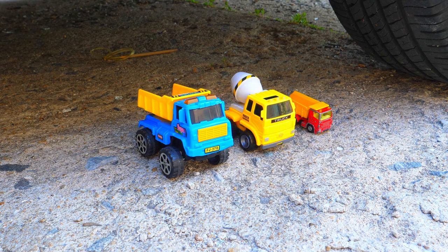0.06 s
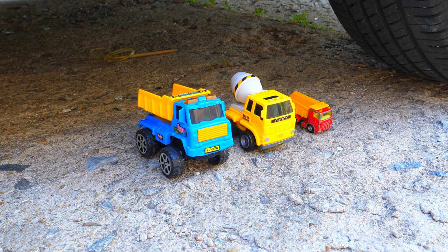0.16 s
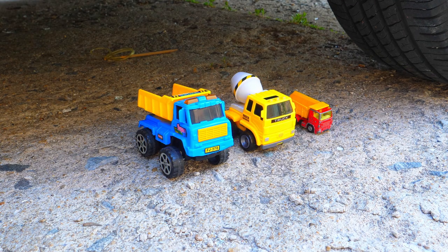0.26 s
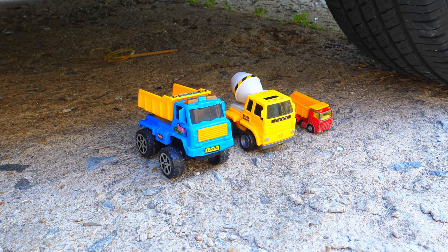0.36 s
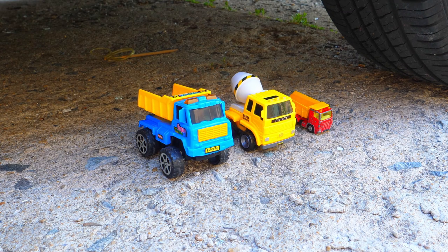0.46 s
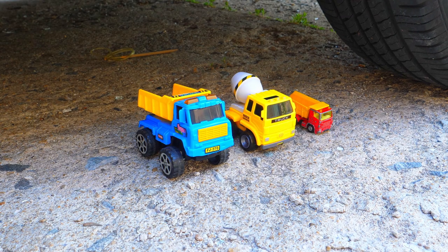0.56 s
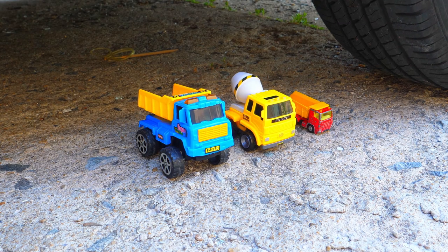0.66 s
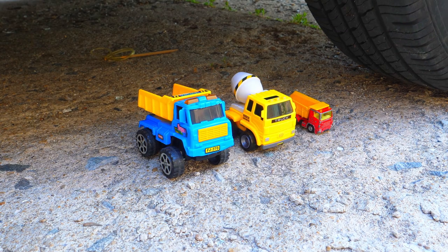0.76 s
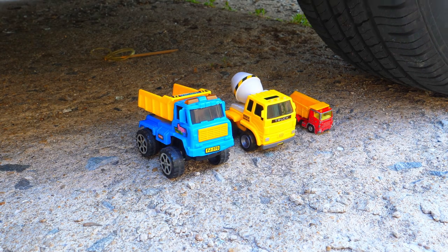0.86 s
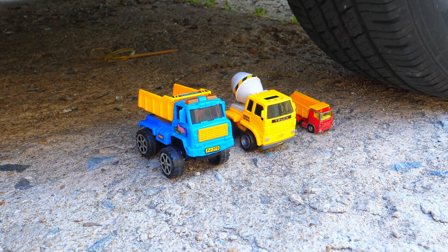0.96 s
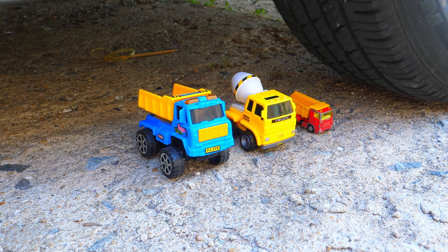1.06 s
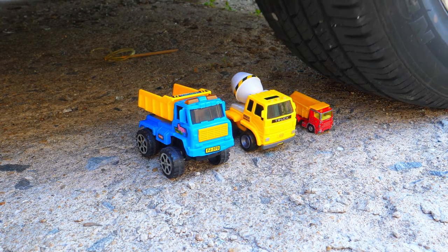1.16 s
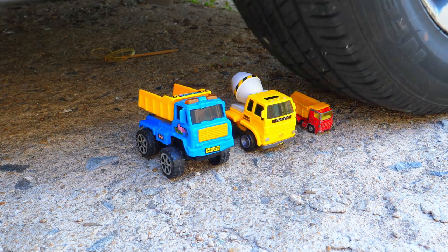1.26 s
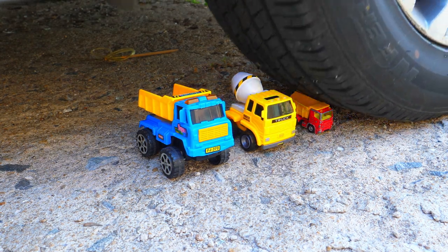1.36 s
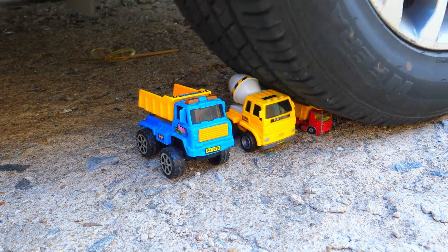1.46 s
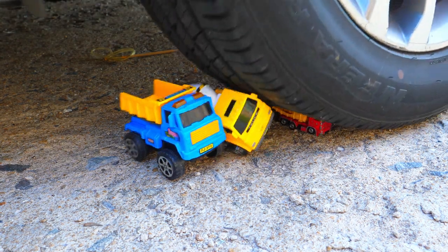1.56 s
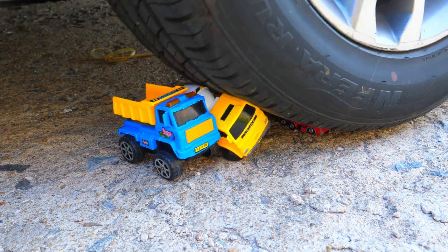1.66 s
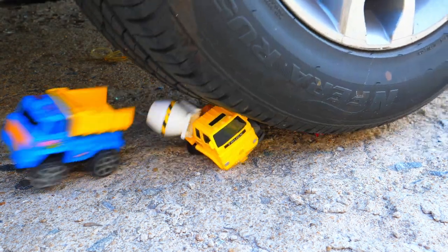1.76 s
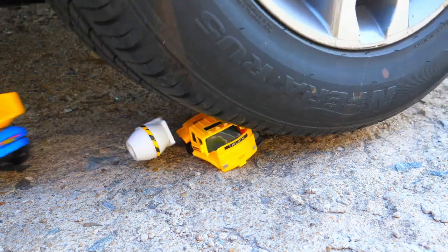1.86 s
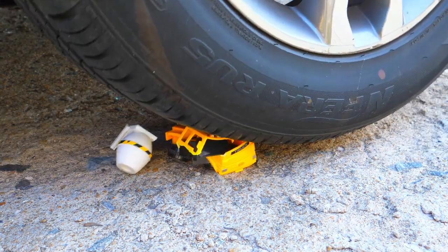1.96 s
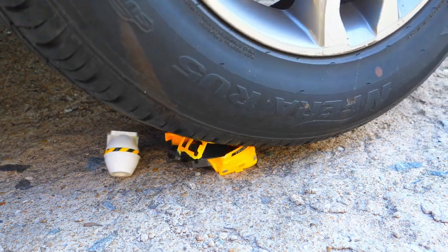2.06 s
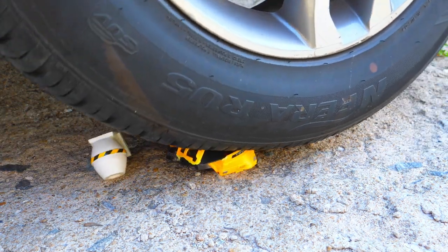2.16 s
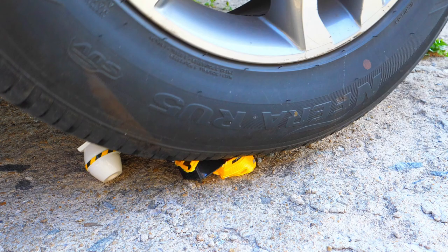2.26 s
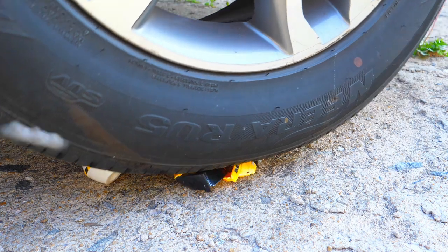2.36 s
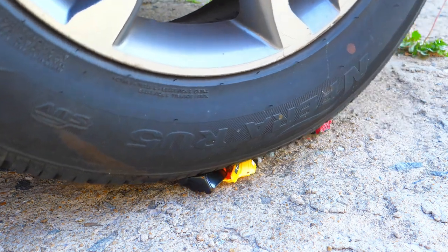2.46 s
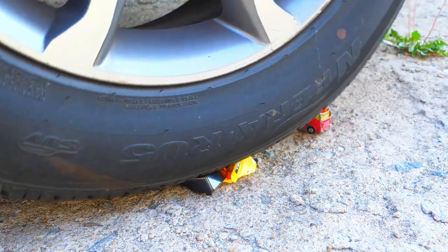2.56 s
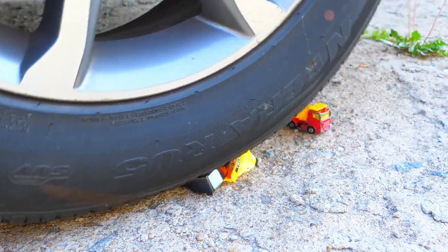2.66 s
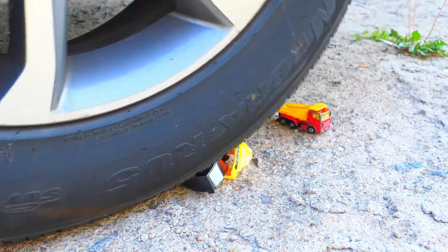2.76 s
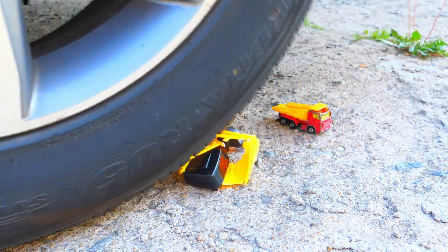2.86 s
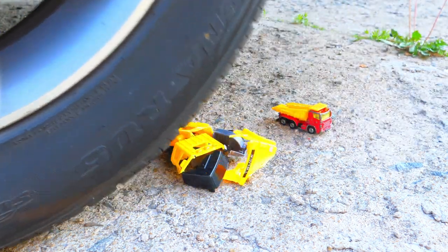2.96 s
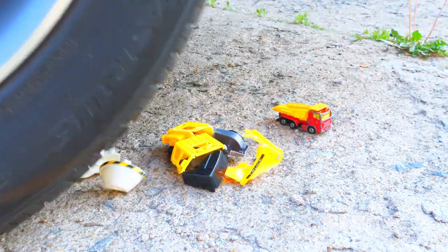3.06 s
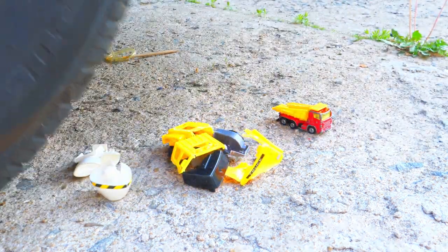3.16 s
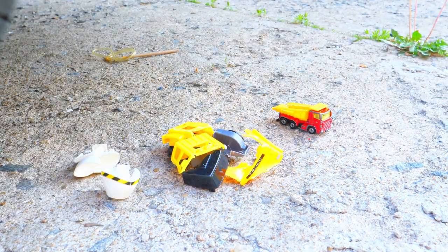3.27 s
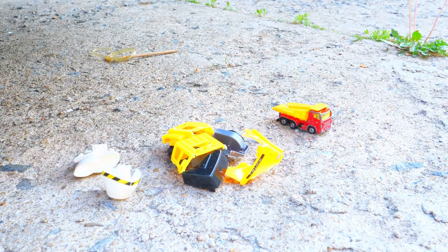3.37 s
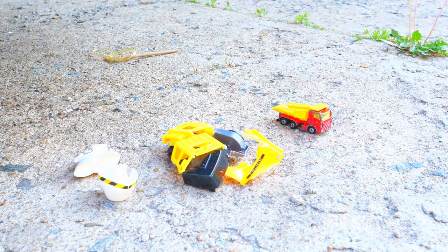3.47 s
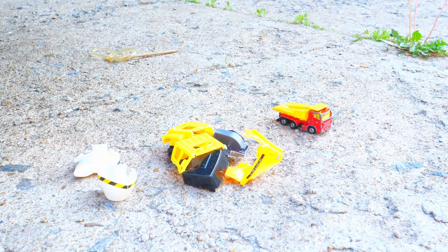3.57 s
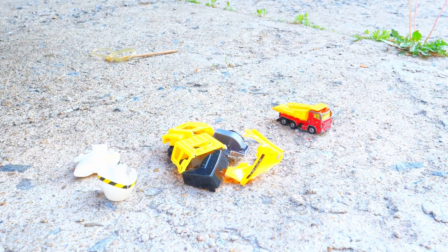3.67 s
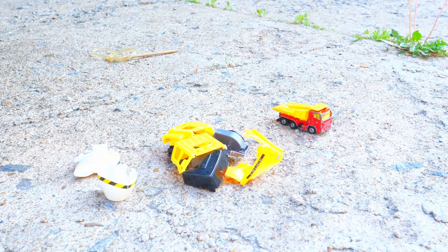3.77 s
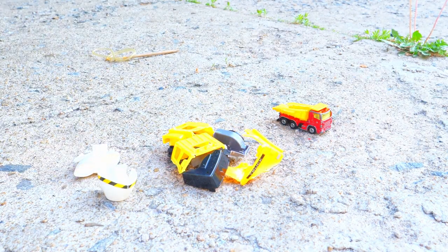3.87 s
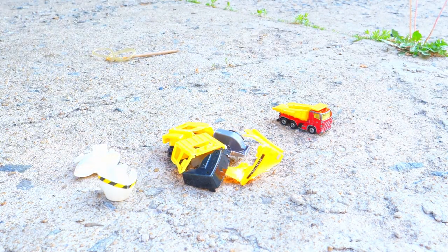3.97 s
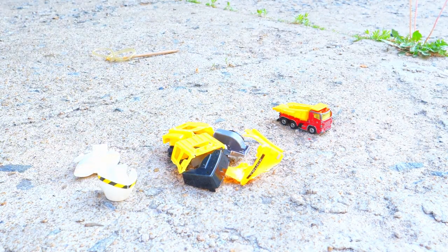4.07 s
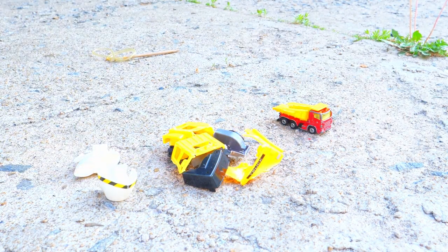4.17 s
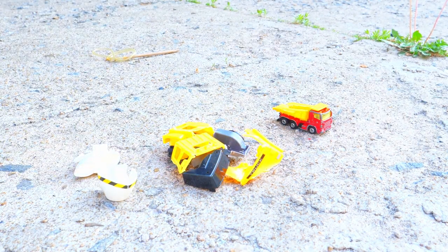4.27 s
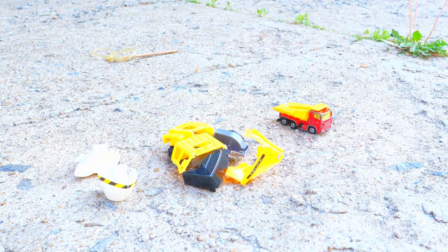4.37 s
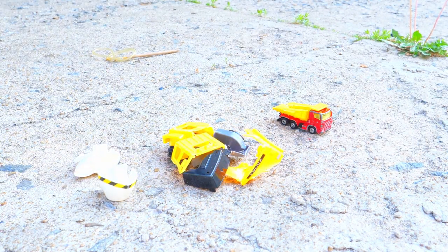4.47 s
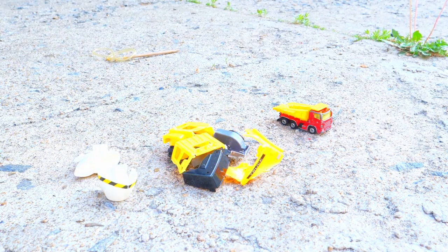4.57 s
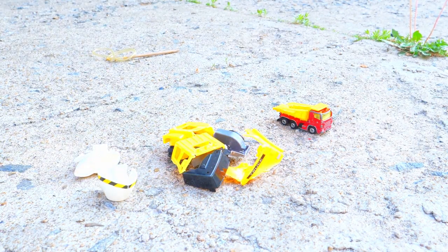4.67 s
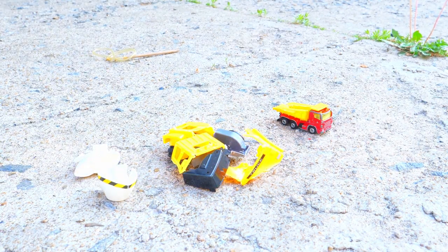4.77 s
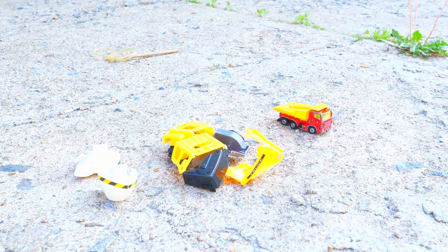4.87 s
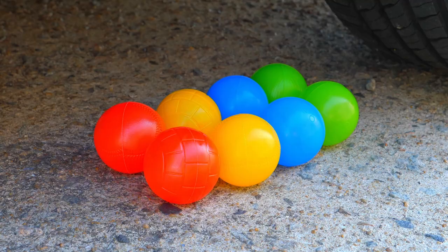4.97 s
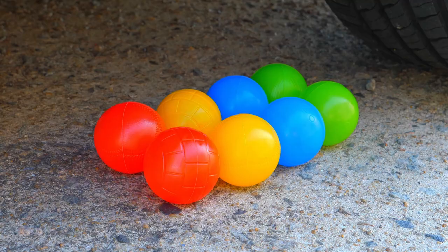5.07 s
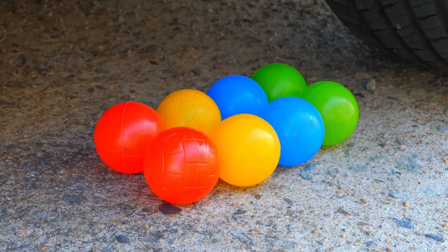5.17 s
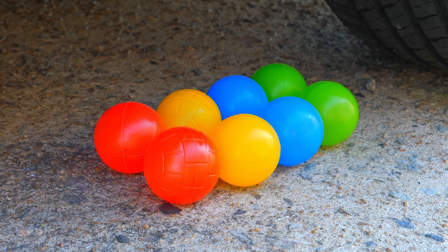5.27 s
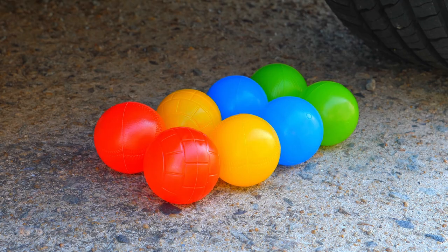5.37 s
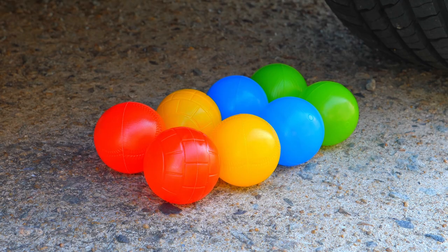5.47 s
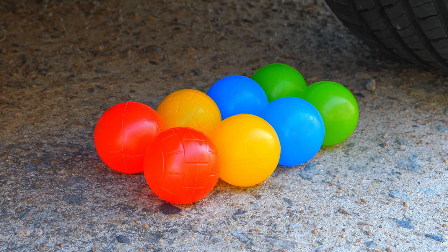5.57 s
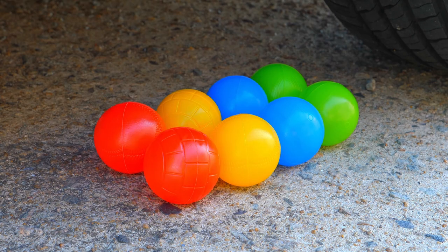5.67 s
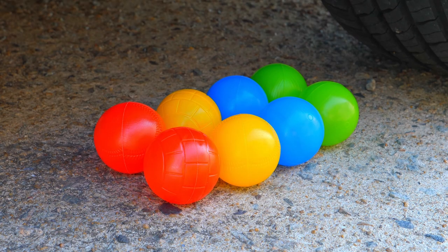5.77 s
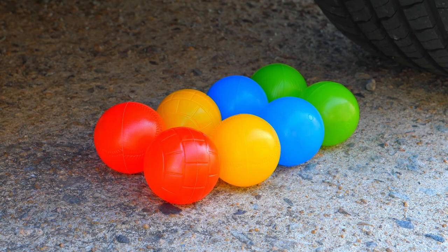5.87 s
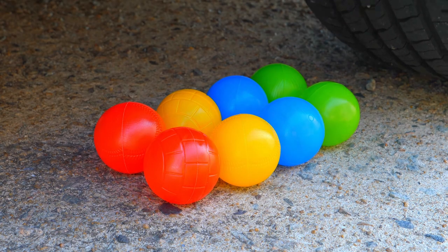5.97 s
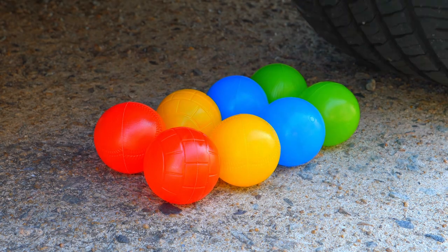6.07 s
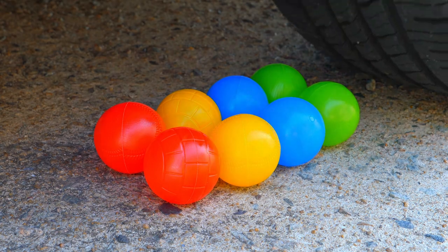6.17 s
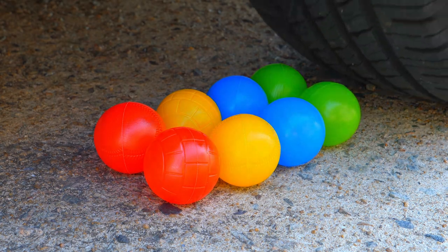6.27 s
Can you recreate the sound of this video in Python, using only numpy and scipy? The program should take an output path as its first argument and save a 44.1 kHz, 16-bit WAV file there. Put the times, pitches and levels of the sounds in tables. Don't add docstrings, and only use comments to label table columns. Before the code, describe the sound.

Steady engine drone on rough concrete, sudden violent bursts of brittle plastic cracking and grinding, settling fragments, a brief gap, then engine idling again.

```python
import sys
import numpy as np
from scipy import signal
from scipy.fft import rfft, irfft
from scipy.io import wavfile
from scipy.ndimage import uniform_filter1d

SR = 44100
rng = np.random.default_rng(int(sys.argv[2]) if len(sys.argv) > 2 else 0)


def gain_from_db(level_db):
    decades = np.asarray(level_db, float) / 20
    return 10 ** decades


def store_wav(level_fs):
    pcm = np.round(np.clip(np.atleast_2d(level_fs), -1, 1) * 32767)
    wavfile.write(sys.argv[1], SR, pcm.T.astype(np.int16))


N = 279153

# start in seconds, peak in dB, ring in Hz, splinter in dB, burst in ms.
CAB_BREAKS = [(1.4151, -12.5, 5940, 5.5, 8.2), (1.4475, -16, 12500, 10.5, 3), (1.4723, -6.5, 11900, 0, 1.7),
              (1.4771, -2.5, 1940, 3.5, 2.1), (1.5074, -7, 2260, 5, 0.98), (1.5459, -6, 4870, -8, 1.7),
              (1.5559, -9, 1920, -6, 2.3), (1.5753, -19, 1760, 0, 1.1), (1.5975, -19, 1137, -12, 1.9),
              (1.603, -12.5, 1140, 6.5, 3.1), (1.6319, -0.5, 1050, -5, 0.43), (1.6539, -12, 1050, -1, 3.5),
              (1.7097, -18, 1120, 10, 3.4), (1.721, -2.5, 1065, 0.5, 7.1), (1.7452, -9, 2280, -7, 9.3),
              (1.8078, -4, 1990, 0, 3.3), (1.8652, -17, 1970, 6, 2), (1.8721, -2.5, 4980, 4, 1.6),
              (1.8805, -9.5, 1990, -3, 4.3), (1.8901, -40, 8530, -5, 2.5), (1.9046, -13, 1190, -20, 0.69),
              (1.9223, -7.5, 2330, 4, 11), (1.9379, -8.5, 4120, 2, 1.8), (2.0526, -13, 4020, 4.5, 2.5)]
# start in seconds, peak in dB, ring in Hz, splinter in dB, hollow body in dB.
CHASSIS_BREAKS = [(2.111, -20.5, 1610, 0, -39), (2.1769, -7.5, 2150, 10.5, -11.5),
                  (2.2122, -10, 8600, 8, -2), (2.2181, -10, 1440, -29, 4), (2.2315, -5.5, 4220, -9, -8),
                  (2.2427, -5.5, 1860, -1, -2), (2.3166, -19, 3240, 8, -2.5), (2.3251, -11.5, 8400, 4, -11),
                  (2.3372, -6, 1090, 5.5, -14), (2.348, -7, 1390, 1, -6), (2.355, -14, 3820, 9, -8),
                  (2.3666, -12, 4900, 3, -11), (2.375, -12.5, 3750, -6, -4), (2.407, -11, 1380, 3.5, -8),
                  (2.437, -17.5, 4220, 13, -6), (2.4584, -23, 3900, -12, -9), (2.4851, -3, 8550, 6, -8),
                  (2.5043, -16.5, 3820, -26, -3), (2.5475, -4, 1750, 3, -8), (2.5906, -23, 4150, 3, -19),
                  (2.6106, -23, 1830, -22, -4), (2.6339, -9.5, 1050, 3.5, 1), (2.6706, -7.5, 925, 4.5, 4),
                  (2.7362, -26.5, 6050, 8, -21)]
# start in seconds, peak in dB, ring in Hz, splinter in dB, burst
# in ms.
DRUM_BREAKS = [(2.7755, -20, 7900, -1, 4.1), (2.8368, -22, 2260, -2, 2.9), (2.8508, -17, 5140, 7, 2.1),
               (2.8574, -14, 2360, -13, 8.9), (2.8709, -18.5, 6400, -2, 3), (2.9338, -19, 5140, -2, 4.9),
               (3.0084, -18, 5700, -22, 2.8), (3.0868, -13, 2170, 1, 1.8), (3.1655, -6, 3360, -3, 2.1),
               (3.1665, -12.5, 2110, -12, 23), (3.21, -12.5, 5700, -4, 21), (3.2328, -10.5, 2040, -1, 4),
               (3.2475, -10.5, 3750, 4, 5.6), (3.253, -5.5, 1310, 1.5, 5.5), (3.265, -12, 7050, 11, 3.5),
                (3.282, -10, 3600, -9, 1.6), (3.288, -4.5, 7130, 8, 1.8), (3.3148, -5, 3770, -2, 3.5),
                (3.3386, -10, 5980, 1, 4.6), (3.352, -10, 3750, -4, 1.6), (3.3574, -5, 3870, -1, 1.6),
                (3.367, -17, 3300, 6, 6), (3.3794, -5.5, 4220, -3, 2.9), (3.3873, -11.5, 3930, 1, 1.1),
                (3.411, -8.5, 3250, -4, 1.7), (3.4523, -3.5, 3430, 0.5, 5.5), (3.4635, -5.5, 3760, 2, 1.8),
                (3.543, -6.5, 3870, -7.5, 0.98), (3.639, -25, 1510, -5, 12), (3.656, -16.5, 5930, 1, 0.94),
                (3.6702, -4.5, 2300, 3, 2), (3.6923, -34, 2720, -21, 5.4), (3.698, -24, 7100, -15, 4.2),
                (3.342, -19.5, 3850, -8, 2.2), (3.213, -12.5, 2370, 8, 1.8), (3.259, -19, 2230, -4, 4.6),
                (3.175, -17, 2150, 2, 4)]
# start in seconds, peak in dB, pitch in Hz, lower ring in dB.
HOLLOW_KNOCKS = [(1.4776, -17.5, 800, 2.5), (1.5076, -9, 903, -24), (1.632, -5.5, 684, -21),
                 (1.7212, -6.5, 1005, -25), (1.8078, -9, 740, -36), (1.8728, -12, 710, -30),
                 (1.9223, -11, 824, -33), (2.2132, -13.5, 736, -18), (2.2188, -21, 520, -21),
                 (2.2315, -8, 710, -22), (2.2426, -3.5, 680, -32), (2.3482, -9.5, 685, -28),
                 (2.3743, -18, 660, -27), (2.4855, -3, 628, -18), (2.5475, -6, 565, -13),
                 (2.601, -29, 680, -12), (2.6346, -7, 723, -32), (2.6712, -22, 790, -20)]
# start in seconds, peak in dB, ring in Hz, splinter in dB,
# burst in ms.
MINOR_CRACKS = [(1.431, -20, 2760, 0, 1.5), (1.465, -24, 3950, 14, 1.5), (1.525, -30, 2980, -4, 1.5),
                (1.541, -24, 6030, 3, 1), (1.569, -22, 2120, 3, 5.9), (1.688, -38, 1330, 8, 2),
                (1.702, -41, 5500, 3, 1.1), (1.782, -32, 5700, -3, 1.3), (1.854, -27, 1940, 8, 2.7),
                (1.897, -15, 1190, -10, 0.66), (1.9152, -15, 1190, -8, 0.7), (1.978, -29, 2330, 0, 6.9),
                (1.991, -32, 2300, 0, 3), (2.025, -42, 1440, 11, 5.8), (2.139, -33, 1440, 8, 3.1),
                (2.198, -22, 6100, -9, 1.6), (2.533, -35, 3500, 10, 1.5), (2.615, -28, 5500, 5, 1.5),
                (2.65, -32, 6460, -3, 2), (2.689, -22, 1420, -8, 2), (2.712, -25.5, 6060, 2, 3),
                (2.794, -20, 4270, -4, 12), (2.826, -24, 1470, -10, 2.5), (2.928, -30, 3500, -2, 3.8),
         (2.963, -27, 4100, 1, 7.4), (2.971, -20, 1400, -15, 0.77), (2.987, -36, 5400, -3, 2),
         (3.005, -24, 2400, -8, 2.4), (3.056, -43, 2320, -8, 8), (3.092, -23, 3900, 3, 3),
         (3.157, -24, 2300, -4, 2), (3.226, -19, 3520, 20.5, 1.5), (3.393, -25, 1290, 6, 3.5),
         (3.527, -35, 7300, 6, 3), (3.586, -28.5, 5800, 1, 2), (3.592, -29, 5600, 5, 7.2),
         (3.619, -32, 4800, -3, 1.5), (3.661, -26, 3860, -12, 4.5), (3.683, -28, 3640, -10, 6.9),
         (3.69, -28, 2780, -10, 8.7), (3.701, -28, 3350, -17, 3.1), (3.712, -28, 3540, -1, 1.7),
         (3.747, -33.5, 3530, -8, 6.1), (3.606, -35, 3200, -1, 7.3), (3.721, -34, 3300, -6, 6),
         (3.789, -35, 3560, 4, 7.8), (3.946, -30, 2970, -9, 3.8), (3.997, -35, 2630, -17, 3),
         (4.058, -41, 2500, -13, 5.3), (4.132, -45, 3500, -10, 1.5), (4.211, -35, 3380, 6, 1.5),
         (4.277, -42, 2680, -10, 4.3), (4.071, -35, 2600, -15, 5.3), (3.871, -41, 8800, -6, 5.5),
         (3.805, -31, 7300, -11, 3.3), (4.231, -34, 2470, -2, 4)]
# frequency in Hz, level in dB per Hz.
SPLINTER = [(3240, -18), (5500, -1), (6880, -0.5), (8710, 4.5), (10500, -5.5), (14100, 0.5), (15000, -3),
            (16000, -12)]
# frequency in Hz, width in Hz, level in dB.
PANELS = [(1440, 1040, 23.5), (2280, 580, -3), (2410, 150, -5), (3760, 1300, 14), (5700, 280, -15),
          (7750, 320, 7)]
# frequency in Hz, time to fade by 60 dB in ms, level in dB.
TRUCK_RINGS = [(1050, 49, -1), (1476, 30, 1.5), (2300, 50, -2.5), (5750, 40, -7)]
DRUM_RINGS = [(1450, 48, -7), (2150, 115, -4.5), (2400, 27, 2), (2780, 49, 2), (3670, 44, -3.5),
              (7300, 45, -6)]
# time in seconds, level in dB.
TREAD_PRESSURE = [(1.36, -73), (1.4, -46), (1.6, -43), (1.8, -36), (1.9, -26.5), (2.02, -37.5), (2.15, -33),
                  (2.28, -41), (2.4, -33),
                  (2.6, -38), (2.9, -27.5), (3.14, -36.5), (3.2, -26), (3.35, -22), (3.44, -30.5), (3.72, -42.5),
           (4.1, -53.5), (4.6, -54)]
# frequency in Hz, level in dB per Hz.
GRIT = [(300, -41), (600, -0.5), (1200, -0.5), (2400, 1), (3200, -1), (4000, -4), (6000, 1.5), (7500, -6)]
# start in seconds, length in ms, level in dB, brightness in dB.
SCRAPES = [(1.406, 27, -25.5, -1), (1.557, 24, -24, -4), (2.039, 13.7, -40.5, 11), (2.174, 8.1, -21.5, -12),
           (2.676, 41, -36, 4.5), (2.841, 49, -37.5, 5), (3.085, 35, -31.5, -9), (3.167, 13, -21.5, 0),
           (3.447, 25, -33, 3), (4.385, 32, -55, 7), (6.23, 20, -32.5, 3)]
# start in seconds, peak in dB, ring in Hz.
SHARDS = [(3.737, -28, 2880), (3.8027, -23.5, 2790), (3.8302, -26.5, 3760), (3.8875, -26.5, 4920),
          (3.914, -22.5, 2730), (3.9318, -31, 2780), (3.9575, -27, 2880), (3.968, -35, 4950),
          (3.985, -27, 2400), (4.031, -37, 2600), (4.079, -29.5, 2630), (4.196, -26.5, 2740),
          (4.227, -26.5, 2330), (4.2437, -27, 3260), (4.2973, -34.5, 2450)]
# start in seconds, peak in dB.
RELAX_TICKS = [(4.3904, -28), (4.417, -29), (4.44, -24), (4.454, -30), (4.4685, -25.5), (4.4854, -31),
               (4.492, -30), (4.5014, -32), (4.515, -35)]
# frequency in Hz, width in Hz, level in dB.
SHARD_RINGS = [(2600, 630, -3.5), (3660, 790, -6.5), (7300, 500, -25)]
# time in seconds, level in dB.
FIRST_ENGINE = [(0, -30.5), (.7, -30.5), (1.38, -30), (1.6, -28), (1.85, -44.5), (2.9, -39.5), (3.6, -46),
                (4.1, -49), (4.99, -48.5)]
# time in seconds, level in dB.
SECOND_ENGINE = [(5.0, -32), (6.33, -30.5)]
# multiple of the firing rate, level in dB.
EXHAUST = [
    [(1, -36), (2, -16), (3, -21), (4, -20), (5, -6), (6, -32), (7, 0), (8, -7.5), (9, -6), (10, -8.5), (11, -14), (12, -32), (13, -2.5), (14, -14), (15, -9.5)],
    [(1, -21), (2, -5), (3, -6), (4, -7), (5, -4), (6, -14), (7, -5), (8, -6), (9, -1.5), (10, -7), (11, -12), (12, -8), (13, 2.5), (14, -26), (15, -26)],
]
# frequency in Hz, width in Hz, level in dB.
BAY = [
    [(565, 70, -5.5), (875, 47, 0), (1228, 55, -3), (1916, 46, -2), (2330, 28, -3), (3250, 32, -12), (3750, 64, 5), (4220, 68, -18), (4600, 71, -21), (5370, 59, -20), (7180, 120, -17)],
    [(578, 80, -3), (869, 24, 7.5), (1310, 67, 2), (2035, 130, -3.5), (2680, 60, -6), (3330, 140, -10), (3930, 400, -11), (4610, 110, -1), (5700, 150, -6), (7400, 160, 1)],
    [(747, 46, 10), (857, 41, 12), (442, 40, -7), (273, 330, 1), (2110, 1100, -11)],
]
# frequency in Hz, level in dB per Hz.
CLATTER = [(24, -44), (40, -21), (150, -16), (310, -11), (500, -4.5), (990, -5), (2900, -9), (3800, -11.5),
           (6000, -14), (8500, -21), (10500, -27.5), (13000, -28), (15500, -35.5), (17000, -58)]
# start in seconds, level in dB.
SURGES = [(1.735, 23), (2.08, 8), (2.77, 5.5), (3.5, 17)]
# start in seconds, length in ms, level in dB.
BUMPS = [(1.46, 40, -43), (3.26, 170, -48)]

CUT_START_S, CUT_END_S = 4.992, 5.018
CAB_HZ, CHASSIS_HZ, DRUM_HZ = 744, 670, 940
CHASSIS_MS = 1.8
CAB_BODY_DB, DRUM_BODY_DB = 0, -8.5
BODY_PER_DB = 1.87
KNOCK_MS, LOWER_HZ, LOWER_MS = 1.7, 344, 7.1
CRUMPLE_DB = -10
THIN_FROM_HZ, THIN_SHARE = 2500, 0.48
DRUM_FROM_S, RING_DB = 2.76, -46.5
SETTLE_MS, RELAX_MS, RELAX_HZ = 4.2, 1.2, 2450
IDLE_HZ, PULL_HZ = (185.6, 186), 197
PULL_START_S, PULL_END_S, PULL_RAMP_S = 1.4, 4.08, 0.046
EXHAUST_DB = -10.5, -22.5
LUG_DB, BOOM_WOBBLE_DB = -13, 4
SURGE_RISE_S, SURGE_FALL_S = 0.033, 0.36
REAR_LIFT_DB, REAR_FROM_S = 9.5, 3.65
DUCK_KNEE_DB, DUCK_SHARE, DUCK_RELEASE_S = -29.5, 0.96, 0.28
TOP_HZ = 16200


def level(x, db=0):
    return x * gain_from_db(db) / np.sqrt(np.mean(x ** 2))


def curve(table):
    seconds, db = np.transpose(table)
    return np.interp(np.arange(N) / SR, seconds, db)


def colour(x, points, peaks=(), lift_db=0):
    hz = np.arange(N // 2 + 1) * SR / N + 1
    point_hz, point_db = np.transpose(points)
    gain = gain_from_db(np.interp(np.log(hz), np.log(point_hz), point_db, -90, -90))
    bumps = sum(gain_from_db(lift_db + db / 2) / (1 + (2 * (hz - f) / w) ** 2) for f, w, db in peaks)
    return irfft(rfft(x) * gain * (1 + bumps), N)


def band(x, lo_hz, hi_hz):
    sos = signal.butter(2, [lo_hz, min(hi_hz, .45 * SR)], "band", fs=SR, output="sos")
    return signal.sosfilt(sos, x)


def walk(rate):
    k = int(SR / rate)
    steps = np.repeat(rng.standard_normal(N // k + 1), k)
    return 1.09 * uniform_filter1d(uniform_filter1d(steps, k), k)[:N]


def breaks():
    def crumple(s):
        return CRUMPLE_DB * any(abs(s - k[0]) < .002 for k in HOLLOW_KNOCKS)

    def knocked(rows, body_db, body_hz):
        return [(s, db, hz, body_db + BODY_PER_DB * db + crumple(s), splinter, ms, body_hz)
                for s, db, hz, splinter, ms in rows]

    chassis = [(s, db, hz, body + crumple(s), splinter, CHASSIS_MS, CHASSIS_HZ)
               for s, db, hz, splinter, body in CHASSIS_BREAKS]
    cab = knocked(CAB_BREAKS, CAB_BODY_DB, CAB_HZ)
    drum = knocked(DRUM_BREAKS, DRUM_BODY_DB, DRUM_HZ)
    truck = snaps(cab + chassis, 0.91, 0.28, -17.0, thin_share=0.2)
    return truck + knocks() + snaps(drum, 0.72, 0.45, -16.0)


def snaps(table, ring_share, ring_ms, tail_db, thin_share=THIN_SHARE):
    out, t = np.zeros(N + 4096), np.arange(4096) / SR
    ragged = rng.standard_normal(N) * gain_from_db(1.7 * walk(900))
    mid = level(band(ragged, 1170, 7560))
    low = level(band(ragged, 253, 640))
    mid = level(colour(mid, ((300, 0.041), (9000, 0)), PANELS, lift_db=2.0))
    thin = level(band(mid, THIN_FROM_HZ, 10200))
    high = level(colour(ragged, SPLINTER))
    chance = rng.random((len(table), 9))
    for (s, db, hz, body_db, splinter_db, ms, body_hz), c in zip(table, chance):
        tau = max(ms, .5) * 0.6 / 1000
        j = int(c[0] * (N - 4096))
        piece = slice(j, j + 4096)
        rise = 1 - np.exp(-(t / (0.31 * tau)) ** 2)
        burst = rise * np.exp(-t / tau)
        tail = rise * gain_from_db(tail_db) * np.exp(-t / 0.013)

        pitch = hz * np.array([[1], [0.45 + 0.375 * c[1]], [1.6 + 0.525 * c[2]]])
        tones = np.sin(2 * np.pi * (pitch * t + c[3:6, None]))
        rings = (tones * [[1], [.35], [.35]]).sum(axis=0)
        rings *= rise * np.exp(-t / (tau * 1.5 + ring_ms / 1000)) * min(1, 0.0031 / tau)
        rings *= .8 + .6 * low[piece][::-1]

        shell = 2 * np.pi * body_hz * (0.798 + 0.42 * c[6]) * t
        body = 1.1 * np.sin(shell) * np.exp(-t / 0.0023)
        body += 0.05 * (CHASSIS_HZ / body_hz) ** 3 * np.sin(.5 * shell) * np.exp(-t / 0.011)
        body += 0.33 * low[piece] * rise * np.exp(-t / 0.0079)

        share = thin_share * (hz > THIN_FROM_HZ)
        noise = 0.59 * (burst + tail) * ((1 - share) * mid[piece] + share * thin[piece])
        noise += 0.5 * gain_from_db(splinter_db) * (burst + 0.86 * tail) * high[piece]
        i = int(s * SR)
        out[i:i + 4096] += gain_from_db(db + 1.5) * (ring_share * rings + noise + 1.25 * gain_from_db(body_db) * body)
    return out[:N]


def knocks():
    out, t = np.zeros(N), np.arange(4096) / SR
    for s, db, hz, low_db in HOLLOW_KNOCKS:
        fade = np.exp(-t * 1000 / KNOCK_MS) + 0.054 * np.exp(-t / 0.013)
        knock = np.sin(2 * np.pi * hz * t) * fade
        lower = np.sin(2 * np.pi * LOWER_HZ * t) * np.exp(-t * 1000 / LOWER_MS)
        out[int(s * SR):][:4096] -= gain_from_db(db + 3.5) * (knock + gain_from_db(low_db + 0.5) * lower)
    return out


def small_cracks():
    rows = [(s, db - 1.5, hz, -22.0, splinter, ms, DRUM_HZ) for s, db, hz, splinter, ms in MINOR_CRACKS]
    return snaps(rows, 1.8, 0.57, -16.0)


def afterring(toys):
    drum = np.arange(N) > DRUM_FROM_S * SR
    out = np.zeros(N)
    for rings, part in ((TRUCK_RINGS, ~drum), (DRUM_RINGS, drum)):
        for hz, ms, db in rings:
            p = np.exp(-np.log(1000) / (ms / 1000 * SR))
            shake = np.abs(toys) * part * rng.standard_normal(N) * gain_from_db(3 * walk(15))
            ring = signal.lfilter([1, 0, -1], [1, -2 * p * np.cos(2 * np.pi * hz / SR), p * p], shake)
            out += ring * gain_from_db(db + 4 * walk(200))
    return out * gain_from_db(RING_DB)


def crackle(rate, spread_db):
    size = gain_from_db(np.minimum(spread_db * rng.exponential(size=N), 9))
    grains = (rng.random(N) < rate / SR) * size
    puffs = signal.lfilter([1], [1, -np.exp(-1 / (0.0069 * SR))], grains)
    return rng.standard_normal(N) * (puffs + 0.87)


def grind(gain):
    t = np.arange(N) / SR
    dull = level(colour(crackle(450, 1.2), GRIT, PANELS, lift_db=-9.5))
    bright = level(colour(crackle(250, 4.0), SPLINTER), -3.7)
    bed = dull * gain_from_db(0.45 * walk(28.9)) + .5 * bright * gain_from_db(1.1 * walk(29.0))
    out = bed * gain_from_db(curve(TREAD_PRESSURE)) * gain
    out[:int(1.37 * SR)] = 0
    out[int(CUT_START_S * SR):] = 0
    for s, ms, db, bright_db in SCRAPES:
        shape = np.interp((t - s) * 1000 / ms, (0, .15, .7, 1.2), (0, 1, .7, 0))
        out += shape * gain_from_db(db + 5.5) * (dull + gain_from_db(bright_db) * bright)
    return out


def shards():
    out, t = np.zeros(N), np.arange(4096) / SR
    rows = [(s, db, hz, SETTLE_MS * hz / RELAX_HZ, .8) for s, db, hz in SHARDS]
    rows += [(s, db - 3.5, RELAX_HZ, RELAX_MS, .15) for s, db in RELAX_TICKS]
    for (s, db, hz, ms, loose), noise in zip(rows, rng.standard_normal((len(rows), 4096))):
        tau = max(ms - 1.0, .2) / 1000
        width = 1 + min(0.69 / ms ** 1.23, .45)
        tick = noise * (1 - np.exp(-t / (0.081 * tau))) * np.exp(-t / tau)
        rustle = tick + 0.18 * noise * np.exp(-t / 0.043)
        tone = np.sin(2 * np.pi * hz * t)
        sound = band(band(tick, hz / width, hz * width), hz / 1.18, hz * 1.5)
        shared = sum(gain_from_db(d) * band(rustle, f - w / 2, f + w / 2) for f, w, d in SHARD_RINGS)
        sound += loose * (shared + 0.15 * band(rustle, 4800, 8600))
        spike = tone[:40] * np.exp(-t[:40] / .0002)
        sound[:40] += (1 - loose) * 2.1 * np.abs(sound).max() * spike
        sound += 0.18 * (hz > 4500) * tone * np.exp(-t / 0.012)
        out[int(s * SR):][:4096] += gain_from_db(db + 2.0) * sound / np.abs(sound).max()
    return out


def thud(toys):
    return 0.051 * band(band(np.tanh(2.7 * toys) ** 2, 94, 215), 66, 340)


def engine(shot, loudness, knock, echo, far=0, pull=0, boom=0):
    idle_hz, partials = IDLE_HZ[shot], EXHAUST[shot]
    phase = 2 * np.pi * np.cumsum(idle_hz / 7 * (1 + .002 * walk(3))) / SR
    climb = 2 * np.pi * np.cumsum(pull * np.full(N, PULL_HZ - idle_hz)) / SR
    rear = far * np.clip((np.arange(N) / SR - REAR_FROM_S) * 5, 0, 1)

    def change_db(k):
        if k == 7:
            return boom
        lift = REAR_LIFT_DB + 8 * (k == 4) - LUG_DB * pull / 2
        return LUG_DB * np.maximum(pull, far / 2) + (k < 6) * lift * rear

    exhaust = np.zeros(N)
    for k, db in partials:
        tone = np.sin(k * phase + (k == 7) * climb + 2 * np.pi * rng.random())
        exhaust += gain_from_db(db + change_db(k) + 1.6 * walk(2.82)) * tone

    beat = np.exp((knock + 0.03 * far) * np.cos(phase) + echo * np.cos(2 * phase + 2.6))
    rattle = rng.standard_normal(N) * beat * gain_from_db(1.7 * walk(180))
    clatter = np.zeros(N)
    for share, peaks in ((1 - far, BAY[shot]), (far, BAY[2])):
        view = colour(rattle, CLATTER, peaks, lift_db=3.0)
        clatter += share * view / np.std(band(view, 500, 1000))
    seventh_db = partials[6][1]
    mix = exhaust * gain_from_db(EXHAUST_DB[shot] + 2.0 - seventh_db) + clatter * gain_from_db(1.35)
    return mix * gain_from_db(curve(loudness))


def surge(t):
    extra_db = np.zeros(N)
    for s, db in SURGES:
        fade = np.exp(-np.maximum(t - s, 0) / SURGE_FALL_S)
        extra_db += db * np.clip((t - s) / SURGE_RISE_S, 0, 1) * fade
    return extra_db


def duck(loud):
    p = np.exp(-1 / (DUCK_RELEASE_S * SR))
    power = signal.lfilter([1 - p], [1, -p], loud ** 2)
    return (1 + power / gain_from_db(2 * DUCK_KNEE_DB)) ** (-DUCK_SHARE / 2)


def bumps():
    t = np.arange(N) / SR
    shape = sum(gain_from_db(db) * np.interp((t - s) * 1000 / ms, (0, .3, 1), (0, 1, 0)) for s, ms, db in BUMPS)
    return shape * level(band(rng.standard_normal(N), 28, 165))


def breeze():
    swell = gain_from_db(2.0 * walk(3.4)) * np.interp(np.arange(N) / SR, (3.8, 4.4), (.2, 1))
    return level(band(rng.standard_normal(N), 24, 145), -59.0) * swell


def scene():
    t = np.arange(N) / SR
    opened = np.clip((t - PULL_START_S) / PULL_RAMP_S, 0, 1)
    closed = np.clip((t - PULL_END_S) / PULL_RAMP_S, 0, 1)
    pull = opened - closed
    far = np.clip((t - 2.2) / 0.34, 0, 1)
    boom = surge(t) + (BOOM_WOBBLE_DB * walk(22.34) - 1) * pull

    cracks = breaks()
    gain = duck(cracks)
    toys = grind(gain ** 0.7) + cracks + shards()
    first = gain * engine(0, FIRST_ENGINE, 0.14, 0.045, far, pull, boom)
    first += thud(toys) + breeze() + bumps()
    second = engine(1, SECOND_ENGINE, 0.16, 0.074)

    toys = band(toys, 305, 13300) + small_cracks()
    toys = toys + afterring(toys)
    before = np.clip((CUT_START_S - t) * 500, 0, 1)
    after = np.clip((t - CUT_END_S) * 500, 0, 1)
    mono = (first + toys) * before + (second + toys) * after
    return np.array([mono, mono])


def band_limit(x):
    return signal.sosfilt(signal.butter(12, 16470, fs=SR, output="sos"), x)


def record(dry):
    clipped = np.clip(dry, -.9, .9)
    mix = signal.sosfilt(signal.ellip(8, .2, 70, TOP_HZ, fs=SR, output="sos"), clipped)
    return band_limit(mix)


dry = scene()
out = record(dry)
store_wav(out)
```